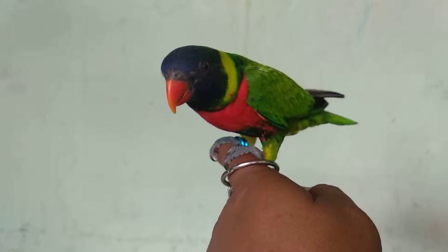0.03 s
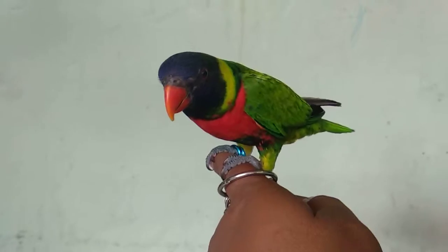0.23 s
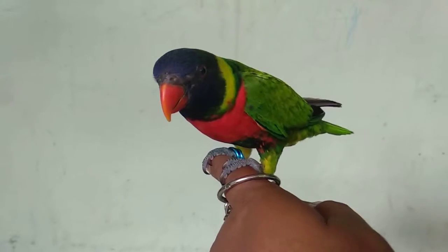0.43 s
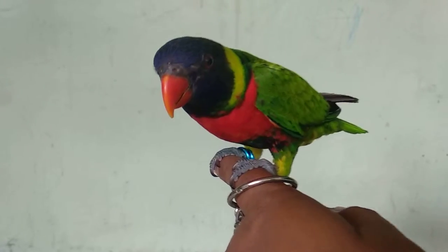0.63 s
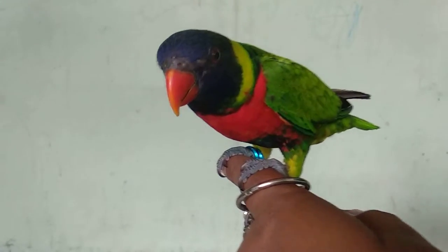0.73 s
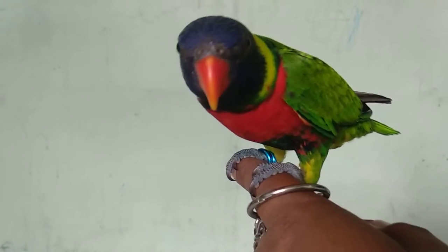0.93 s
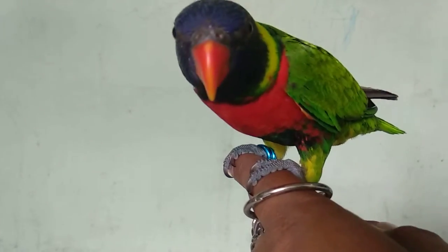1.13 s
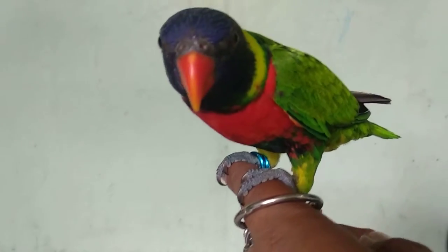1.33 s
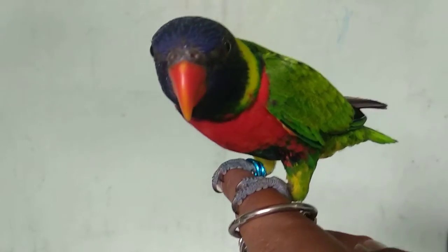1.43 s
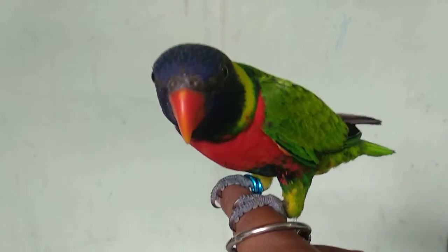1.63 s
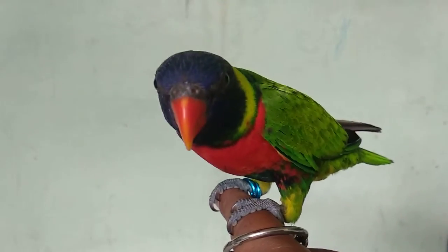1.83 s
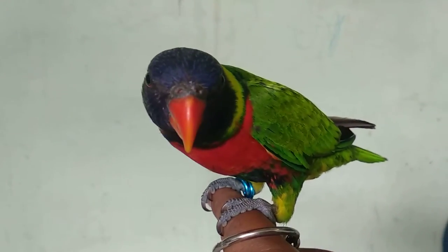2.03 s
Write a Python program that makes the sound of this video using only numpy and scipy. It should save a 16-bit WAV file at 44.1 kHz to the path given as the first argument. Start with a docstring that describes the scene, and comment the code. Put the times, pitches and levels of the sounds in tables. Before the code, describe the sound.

Close, raspy parrot calls in a small hard-walled room, after a few dry foot scrapes and taps; a squeal slides down midway, with soft feather rustles, low handling bumps and faint fan-like hum beneath.

```python
"""In a small, bare room a pet lorikeet chatters on a hand, close to the microphones.
Its notes stack overtones on a pitch mostly near 2.2 kHz, torn by jitter and rasp; one squeal falls among them.
Scuffs of shaped noise and ringing knocks come mostly first, with soft noise rustles of feathers.
Underneath are a fan-like hum of wavering sines, a rush of air noise, and low handling bumps with one drone.
"""
import sys
import numpy as np
from scipy import signal
from scipy.fft import rfft, irfft, next_fast_len
from scipy.io import wavfile
from scipy.ndimage import map_coordinates

SR = 44100
rng = np.random.default_rng(int(sys.argv[2]) if len(sys.argv) > 2 else 0)


def to_wav(sig):
    """Store sig (one row per channel, or 1-D mono) as 16-bit WAV at the path in sys.argv[1].

    Samples outside -1..1 are clipped; the rate is SR.
    """
    pcm = np.clip(np.atleast_2d(sig), -1, 1) * 32767
    pcm = np.round(pcm).astype(np.int16)
    wavfile.write(sys.argv[1], SR, pcm.T)  # frames by channels


N = 91154


def amp(db):
    """Turn decibels into a gain."""
    return 10 ** (np.asarray(db) / 20)


def unit(x):
    """Scale a sound to an average strength (rms) of 1."""
    return x / np.sqrt(np.mean(x ** 2) + 1e-20)


def clock():
    """Give the time of each sample in seconds."""
    return np.arange(N) / SR


def along(points, hz):
    """Read a curve of (Hz, value) points, joined by straight lines on a log frequency axis."""
    point_hz, value = np.transpose(points)
    return np.interp(np.log(hz + 1), np.log(point_hz + 1), value)


def wobble(rate):
    """Draw a smooth random curve around zero, with `rate` random knots a second."""
    coarse = clock()[::8]
    knots = rng.standard_normal(size=4096)
    curve = map_coordinates(knots, [coarse * rate], mode="wrap")
    return np.interp(clock(), coarse, curve)


def filtered(x, response):
    """Multiply the spectrum of x by a response that depends on frequency."""
    size = next_fast_len(N + SR // 2)
    hz = np.fft.rfftfreq(size, 1 / SR)
    return irfft(rfft(x, size) * response(hz), size)[..., :N]


def noise(spectrum):
    """Make random hiss with the given (Hz, dB) colour and an rms of 1."""
    return unit(filtered(rng.standard_normal(N), lambda hz: amp(along(spectrum, hz))))


def gate(start, length, attack, release):
    """Rise in a straight line, hold until `length` after the start, then die away exponentially."""
    t = clock() - start
    rise = np.clip(t / attack, 0, 1)
    return rise * np.exp(-np.maximum(t - length, 0) / release)


def air_rush():
    """Room air is broad noise, alike at both microphones in the bass and unrelated in the treble."""
    # colour of the air: pitch_hz, level_db
    air_colour = [(25, -48), (42, -44), (62, -6), (115, 2), (165, -7), (260, -8), (400, -15), (900, -16.5),
                  (1500, -18.5), (3000, -20.5), (7000, -23), (12000, -25.5), (15500, -35.5)]
    # how alike left and right are: pitch_hz, likeness (0-1)
    likeness = [(100, 0.94), (300, 0.92), (700, 0.53), (1500, 0), (8000, 0)]
    air_db = -42.5

    def shares(hz):
        turn = np.arccos(np.clip(along(likeness, hz), -1, 1)) / 2
        return np.array([np.cos(turn), np.sin(turn)])

    mid, side = filtered(np.array([noise(air_colour), noise(air_colour)]), shares)
    return amp(air_db) * np.array([mid + side, mid - side])


def fan_hum():
    """The fan-like hum is a set of steady-level sines whose phases waver slowly."""
    # hum lines: pitch_hz, level_db
    hum_lines = [(72, -54), (110, -52), (128, -50.5), (216, -58), (238, -52.5), (759, -59), (902, -64)]
    lines = 0
    for hz, db in hum_lines:
        waver = (0.083 + 70 / hz) * wobble(9.54)  # radians, widest on the lowest lines
        lines = lines + amp(db) * unit(np.sin(2 * np.pi * hz * clock() + waver))
    return lines


def handling():
    """Handling gives soft bumps of low rumble, then a short low drone."""
    # bumps: centre_s, half_width_s, level_db
    bumps = [(.3, 0.044, -45.5), (.45, 0.02, -37), (.63, 0.06, -39.5), (.82, 0.021, -41.5),
             (1.03, 0.016, -32), (1.2, 0.024, -39), (1.374, 0.0098, -32.5), (1.41, 0.011, -31.5),
             (1.599, 0.023, -34), (1.665, .012, -34.5)]
    # colour of the bumps: pitch_hz, level_db
    bump_colour = [(38, -55), (52, -24), (68, -17.5), (105, -0.5), (130, 3.5), (160, -21), (300, -23),
                   (800, -42), (3000, -110)]
    drone_start_s, drone_end_s, drone_hz, drone_db = 1.76, 1.98, 71.6, -39
    t = clock()
    swell = sum(amp(db) * np.exp(-.5 * ((t - s) / width) ** 2) for s, width, db in bumps)
    # dividing by its own loudness curve evens out the rumble
    rumble = signal.hilbert(noise(bump_colour))
    even = unit(rumble.real / (np.abs(rumble) + .5))
    drone = unit(np.sin(2 * np.pi * drone_hz * t))
    drone = drone * gate(drone_start_s, drone_end_s - drone_start_s, .04, 0.024)
    return swell * even + amp(drone_db) * drone


def rustles():
    """Feathers brush in soft strokes of noise, made grainy by quick random swings in level."""
    # strokes: start_s, length_s, level_db
    stroke_list = [(0.349, 0.029, -49), (0.392, 0.072, -47), (0.605, 0.055, -46), (1.514, 0.17, -47.5),
                   (1.687, .1, -44.5), (1.926, 0.034, -48)]
    # colour of the feathers: pitch_hz, level_db
    feather_colour = [(300, -10), (900, -2), (1600, 6), (2600, -1), (5000, -11.5), (9000, -9), (15000, -13)]
    strokes = sum(amp(db) * gate(s, length, 0.0086, 0.004) for s, length, db in stroke_list)
    return strokes * unit(noise(feather_colour) * amp(2.7 * wobble(400)))


def scuffs():
    """Feet and beak scuff and tap: short grainy scrapes, each with a ringing knock of fading sines."""
    # scuffs: start_s, level_db, fade_s (time to fall 60 dB), knock_db (beside the scrape)
    scuff_list = [(.187, -39.5, 0.13, -26), (0.207, -41, 0.14, -31), (0.275, -39.5, 0.088, 5),
                  (.427, -36, 0.18, -10), (.455, -42, 0.067, 2), (0.472, -33, 0.1, -8),
                  (0.576, -50, 0.13, 6), (.708, -46.5, .08, 8)]
    # colour of the scrape: pitch_hz, level_db
    scrape_colour = [(300, -22), (1500, -7), (2800, 2.5), (5000, -2), (10000, -2.5), (15000, -23)]
    # what a tap rings with: pitch_hz, level_db, fade_s (time to fall 60 dB)
    knock_tones = [(490, -5.5, 0.08), (742, -2.5, 0.086), (951, 0, 0.071), (1075, -5, 0.038),
                   (1336, -3.5, 0.033), (2577, -4, .09)]

    def strike(start, fade):
        return gate(start, 0.0015, 0.00051, fade / np.log(1000))

    out = np.zeros(N)
    for start, db, fade, knock_db in scuff_list:
        scrape = strike(start, fade) * unit(noise(scrape_colour) * amp(2.7 * wobble(500)))
        ring = np.zeros(N)
        for hz, tone_db, tone_fade in knock_tones:
            gain = amp(tone_db + rng.normal(0, 2))  # each tap rings a little differently
            phase = 2 * np.pi * hz * (clock() - start) + 0.76 * wobble(150)
            ring += gain * strike(start, tone_fade) * np.sin(phase)
        out += amp(db) * (scrape + amp(knock_db) * ring)
    return out


def syrinx(pitch_hz, rough, harmonics, rasp_db):
    """A wavering membrane: roughness smears each overtone into a band, air rasps, and both flutter in level."""
    # colour of the rasping air: pitch_hz, level_db
    rasp_colour = [(900, -42), (1600, -24), (2100, -3), (3200, 4), (4400, 4), (7000, -0.5), (9500, -2.5),
                   (12200, -12), (13500, -30), (16000, -30)]
    # fast pitch scatter and slower waver at full roughness, as shares of the pitch
    jitter, waver = 0.0156, .022
    # random knots a second
    jitter_rate, waver_rate, rough_rate, flutter_rate = 1500, 160, 800, 280
    flutter_db = 3  # depth of the level flutter
    rough = np.clip(rough, 0, 1)
    scatter = rough * jitter * wobble(jitter_rate)
    drift = np.sqrt(rough) * waver * wobble(waver_rate)
    phase = 2 * np.pi * np.cumsum(pitch_hz * (1 + scatter + drift)) / SR
    tone = 0
    for k, db in enumerate(harmonics, 1):
        # random swings in size and phase widen this overtone
        swings = wobble(rough_rate) + 1j * wobble(rough_rate)
        swing = np.sqrt(1 - rough) + np.sqrt(rough / 2) * swings
        tone = tone + amp(db) * (swing * np.exp(1j * k * phase)).real
    voiced = unit(tone) + amp(rasp_db) * noise(rasp_colour)
    return unit(voiced * amp(flutter_db * wobble(flutter_rate)))


def squeal():
    """One squeal slides down about an octave, rough at first and clearing as the membrane slows."""
    # path of the squeal: time_s, pitch_hz, level_db, roughness (0-1)
    path = [(1.131, 5600, -33.5, 0.89), (1.165, 5120, -31.5, 0.73), (1.195, 4758, -26.5, 0.52),
            (1.215, 4230, -32.5, 0.4), (1.239, 3755, -34, 0.42), (1.26, 3196, -35, 0.24),
            (1.291, 2870, -44, 0.1), (1.333, 2680, -48, 0.08)]
    # its overtones: multiple of the pitch, level_db
    overtones = [(1, 7.5), (2, -9), (3, -27)]
    rasp_db = -14
    s, hz, db, rough = np.transpose(path)
    t = clock()
    level = amp(np.interp(t, s, db, left=-np.inf, right=-np.inf))  # silent outside the path
    overtone_db = np.array(overtones)[:, 1]
    return level * syrinx(np.interp(t, s, hz), np.interp(t, s, rough), overtone_db, rasp_db)


def chatter():
    """Short notes with their own roughness and overtones; they may overlap, as a syrinx has two sides."""
    # notes: start_s, length_s, first_pitch_hz, last_pitch_hz, level_db, roughness (0-1), rasp_db (beside the tone),
    # then changes to the shared overtones: fundamental_db, odd_overtones_db, treble_db
    notes = [ (0.653, 0.052, 2012, 2050, -38.5, 0.03, -8, 6, 7, 9),
             (0.667, 0.041, 2126, 2130, -32.5, .45, 2, 15, 14, 7),
             (0.704, 0.094, 2106, 2066, -35, 0.78, 7, 13, 19, 8),
             (0.83, 0.05, 2020, 2070, -34, 0.18, 3, 10, 3, 2.5),
             (0.888, .055, 2180, 2261, -35, .5, -3, -7, -7, -11),
             (.962, 0.054, 2187, 2160, -35, .6, -4, -8, -7, -8),
             (0.977, .035, 1970, 1970, -39, 0.47, -10, -8, -10, -0.5),
             (1.015, .023, 2106, 2140, -24, 0.97, -23, -20, 6, -2),
             (1.047, 0.049, 2143, 2170, -35, 0.89, -18, -26, 7, -10),
             (1.11, .06, 2150, 2030, -32.5, 0.98, -7.5, -31, 8, 0.5),
             (1.14, .02, 2680, 2680, -46, 0.16, -15, 30, -6, -6),
             (1.42, 0.028, 2426, 2420, -30.5, 0.29, -7.5, -25, -14, 3),
             (1.414, 0.061, 2218, 2150, -38.5, 0.6, -8.5, -7, -9, 4),
             (1.467, 0.055, 2410, 2430, -37.5, 0, -2.5, -10, -10, 0.5),
             (1.526, 0.0463, 2146, 2196, -29.5, 0.81, -11, -12.5, -14, -3.5),
             (1.578, 0.09, 2239, 2300, -35, .7, -4.5, -9, -8, -16),
             (1.654, 0.099, 2345, 2340, -35, 0.31, 1, -5, -22, -2),
             (1.803, 0.086, 2600, 2616, -33.5, .2, -31, -4.5, 0.5, 0.5),
             (2.044, 0.022, 2130, 2320, -35, .5, -8.5, 3, 5, 0.5)]
    # shared overtones: multiple of the pitch, level_db
    overtones = [(1, -7.5), (2, -1), (3, -9.5), (4, -10), (5, -15.5), (6, -9)]
    attack_s, release_s = .013, 0.0094
    out = np.zeros(N)
    base = np.array(overtones)[:, 1]
    k = np.arange(len(base)) + 1
    for start, length, first, last, db, rough, rasp_db, root_db, odd_db, treble_db in notes:
        pitch = np.interp(clock(), [start, start + length], [first, last])
        levels = base + root_db * (k == 1) + odd_db * np.isin(k, (3, 5)) + treble_db * (k > 3)
        envelope = gate(start, length, attack_s, release_s)
        out += amp(db) * envelope * syrinx(pitch, rough, levels, rasp_db)
    return out


def bird_voice():
    """The throat and beak colour every call, strengthening some pitches and weakening others."""
    # colour of throat and beak: pitch_hz, level_db
    beak_colour = [(2000, 0.5), (6500, 1), (9800, 3), (10700, -3), (11700, 11.5), (12900, 1), (13600, -13),
                   (15000, -19)]
    return filtered(chatter() + squeal(), lambda hz: amp(along(beak_colour, hz)))


def room(x):
    """Bare walls answer with a fading noise tail, different at each microphone."""
    # how long the echo rings: pitch_hz, fade_s (time to fall 60 dB)
    echo_fade = [(300, 0.47), (2500, 0.4), (6000, 0.51), (13000, 0.38)]
    hz, t, z = signal.stft(rng.standard_normal((2, SR // 2)), SR, nperseg=256)
    fading = z * amp(-60 * t / along(echo_fade, hz)[:, None])
    tail = signal.istft(fading, SR, nperseg=256)[1]
    tail = np.pad(tail, ((0, 0), (SR // 300, 0)))  # the echo starts about 3 ms late
    return signal.fftconvolve(x[None], tail / np.linalg.norm(tail[0]), axes=1)[:, :N]


def hand_side(x):
    """Sounds from the hand reach the left microphone later than the right."""
    left_lag_s = 0.000367
    # half the lag goes on the left, and the right is moved earlier by the other half
    return filtered(x, lambda hz: np.exp(np.pi * left_lag_s * np.outer([-1j, 1j], hz)))


def scene():
    """Mix the bird and its movements, direct and echoed, with handling, hum and air."""
    direct_db, moves_direct_db, room_db = -6.5, 0.5, -1
    background = fan_hum() + air_rush()
    bumps = handling()
    moves = scuffs() + rustles()
    voice = bird_voice()
    near = hand_side(amp(moves_direct_db) * moves + bumps)
    return amp(direct_db) * voice + near + amp(room_db) * room(voice + moves) + background


def record(dry):
    """Two microphones with unlike colour, a fade-in, and a cut of everything above the top pitch."""
    # left minus right: pitch_hz, difference_db
    balance = [(150, 0.76), (700, 0), (1300, 4), (2500, 9), (6000, 5.5), (8500, 5), (10000, -1),
               (11500, -4), (13000, -6.5), (15000, 10)]
    # fade-in: time_s, level_db
    fade_in = [(.095, -55), (0.109, -13.5), (0.141, -9), (.28, -0.5)]
    top_hz = 15750
    heard = filtered(dry, lambda hz: amp(np.outer([.5, -.5], along(balance, hz))))
    s, db = np.transpose(fade_in)
    opening = amp(np.interp(clock(), s, db, left=-np.inf))  # silent before the fade starts
    return filtered(heard * opening, lambda hz: hz < top_hz)


dry = scene()
out = record(dry)
to_wav(out)
```